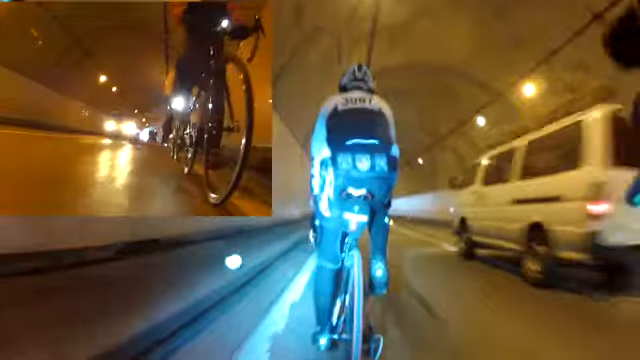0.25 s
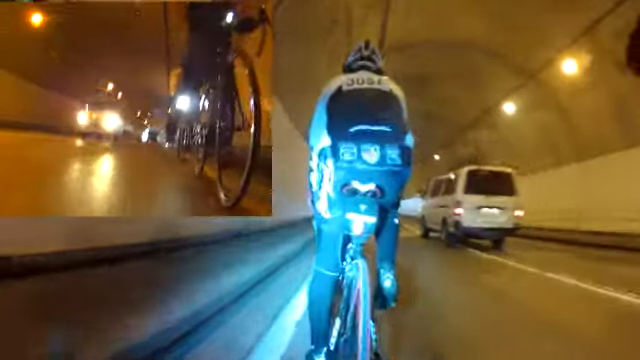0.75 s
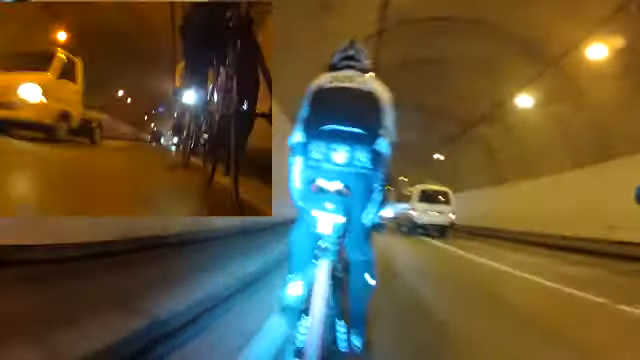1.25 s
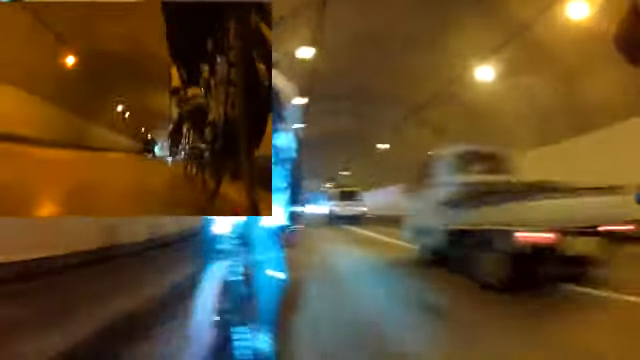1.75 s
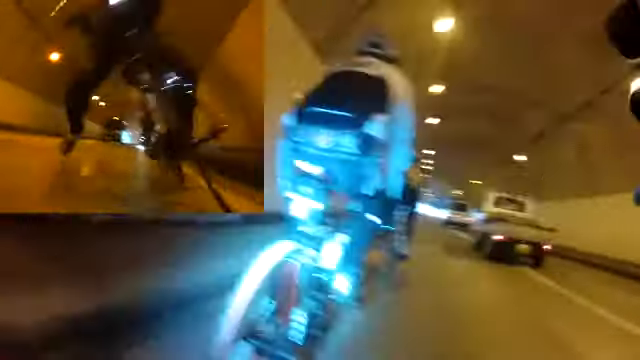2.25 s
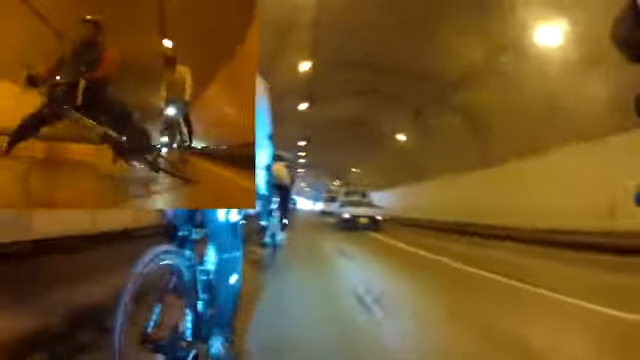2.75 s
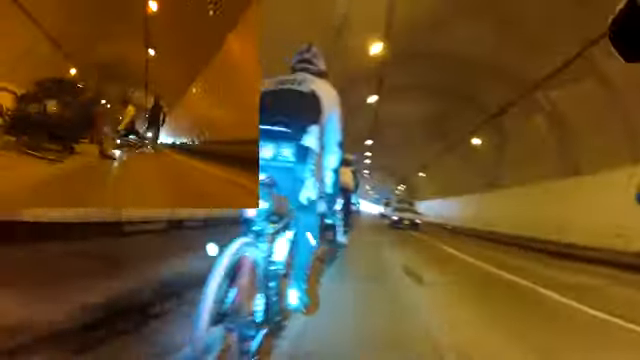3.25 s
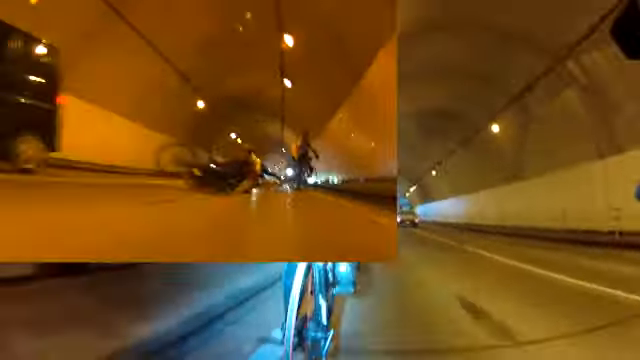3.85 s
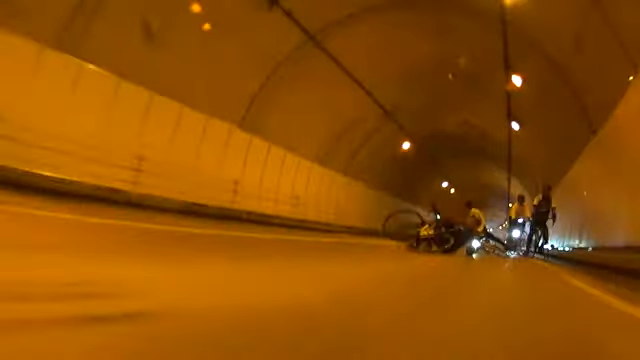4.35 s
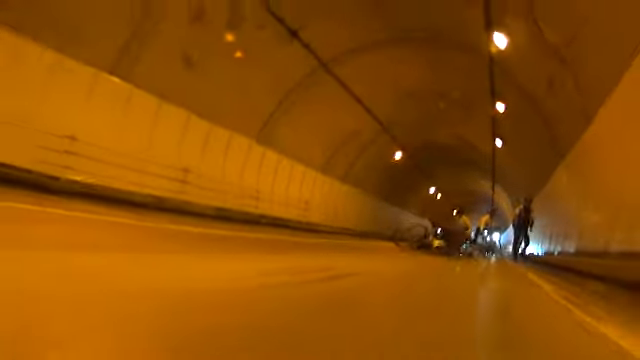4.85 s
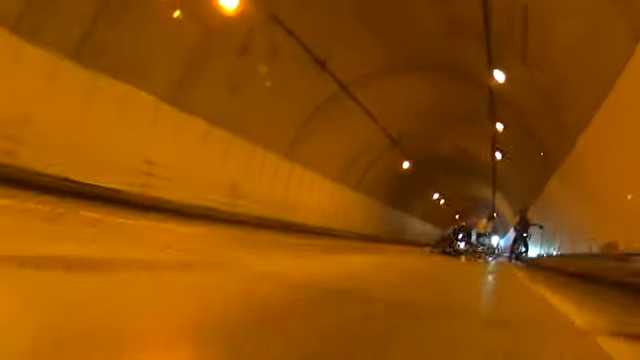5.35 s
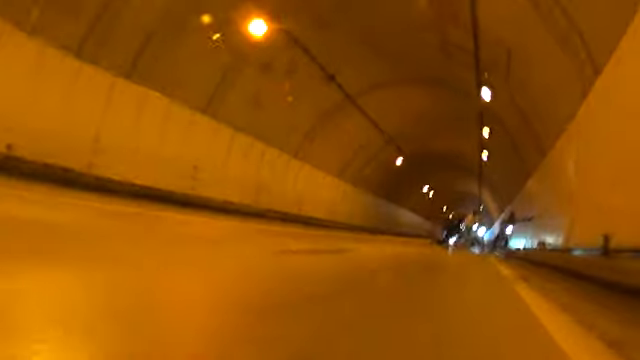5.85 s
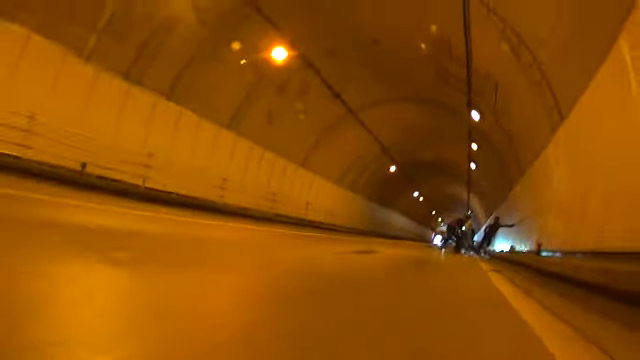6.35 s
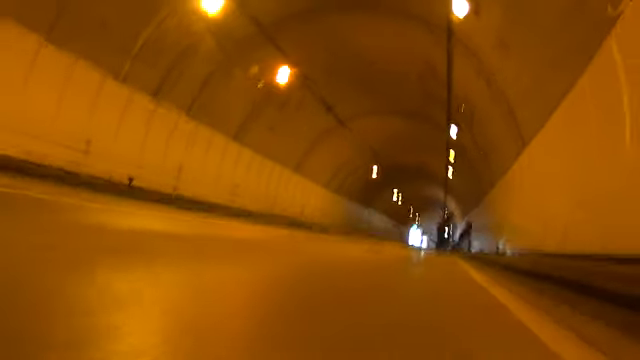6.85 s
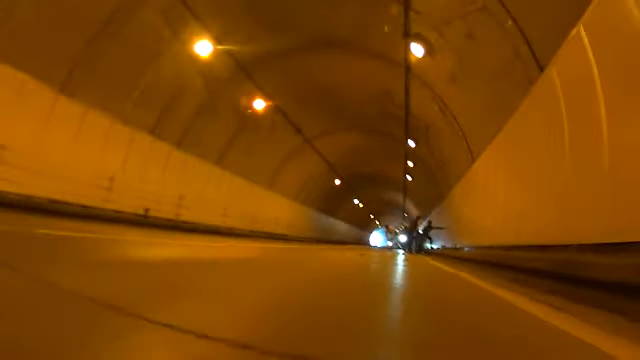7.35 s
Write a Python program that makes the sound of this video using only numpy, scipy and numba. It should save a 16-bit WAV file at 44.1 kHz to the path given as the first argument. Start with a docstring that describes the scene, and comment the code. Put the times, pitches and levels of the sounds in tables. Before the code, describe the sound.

Close onboard bicycle ride in a tunnel: pulsing low rumble, road buzz and traffic-like roar, broken by hard bumps, gritty scrapes and metallic ticks.

```python
"""A bicycle's loose camera mount bounces near 37 Hz as it rides through a road tunnel.
The rear camera (mono, gain control, coarse clock) adds noise-driven road drone and tyre buzz.
The front camera (two ports) hears banded noise: wind and traffic roar off the tunnel walls.
On top: mount rattle from tapped modes, gritty scrapes, bump knocks shared by both cameras,
chain ticks, wavering rubbing squeals and opposite-phase case twists."""
import sys
import numpy as np
from scipy import signal
from scipy.fft import rfft, irfft
from scipy.io import wavfile
from scipy.ndimage import uniform_filter1d
from numba import njit

SR = 44100
rng = np.random.default_rng(int(sys.argv[2]) if len(sys.argv) > 2 else 0)


def to_wav(sig):
    """Store sig (one row per channel, or 1-D mono) as 16-bit WAV at the path in sys.argv[1].

    Samples outside -1..1 are clipped; the rate is SR.
    """
    pcm = np.clip(np.atleast_2d(sig), -1, 1) * 32767
    pcm = np.round(pcm).astype(np.int16)
    wavfile.write(sys.argv[1], SR, pcm.T)  # frames by channels


N = 335598
TIME = np.arange(N) / SR
HZ = np.maximum(np.fft.rfftfreq(N, 1 / SR), 1)


def undb(db):
    """Amplitude factor of a level in dB."""
    return 10 ** (np.asarray(db) / 20)


def unit(x):
    """Scale to an rms of 1."""
    return x / np.sqrt(np.mean(x ** 2))


def walk(rate_hz):
    """Random levels held 1 / rate_hz s and slewed twice; spread near 1."""
    hold = int(SR / rate_hz)
    steps = np.repeat(rng.standard_normal(N // hold + 1), hold)
    return 1.17 * uniform_filter1d(uniform_filter1d(steps, hold), hold)[:N]


def noise():
    """Spectrum of white noise."""
    return rfft(rng.standard_normal(N))


def ring(push, hz, t60_s):
    """One exponentially decaying mode, struck by push."""
    pole = np.exp(2j * np.pi * hz / SR - np.log(1000) / (max(t60_s, 1 / 500) * SR))
    return signal.lfilter([1], [1, -pole], push).imag


def panned(x, pan_db):
    """Left and right, pan_db apart (left minus right)."""
    return x * undb(np.array([[pan_db], [-pan_db]]) / 2)


def bandpass(x, order, low_hz, high_hz):
    """Butterworth band-pass."""
    return signal.sosfilt(signal.butter(order, [low_hz, high_hz], "band", fs=SR, output="sos"), x)


# bounce of the rear camera on its mount, before gain control: (time [s], level [dB])
WOBBLE = [(0, -5), (.11, -7), (0.191, -19), (.27, -3.5), (.36, -9.5), (0.479, -3), (.63, -17), (.71, -9.5),
          (0.759, -24), (.82, -10.5), (.89, -18), (0.959, -5), (1.261, -9), (1.331, -24), (1.46, -17.5),
          (1.55, -4.5), (1.659, -.5), (1.88, -16), (2.0, -27), (2.13, -9.5), (2.23, -24), (2.35, -11.5),
          (2.55, -26.5), (2.74, -8.5), (2.979, -5.5), (3.16, -19), (3.419, -7.5), (3.54, -20.5), (3.74, -9),
          (3.919, -27), (4.029, -8.5), (4.119, -21), (4.2, -7.5), (4.25, -16.5), (4.31, -4), (4.41, -9.5),
          (4.46, -25.5), (4.658, -4), (4.898, -22), (5.211, -4), (5.309, -22), (5.38, -9.5), (5.431, -24.5),
          (5.62, -8), (5.742, -21.5), (5.791, -12.5), (5.93, -16), (5.99, -28.5), (6.049, -12),
          (6.35, -6.5), (6.48, -21), (6.531, -11), (6.83, -14.5), (6.929, -5), (7.24, -9.5), (7.36, -25),
          (7.451, -24.5), (7.61, -5.5)]


def swing_size():
    """Bounce amplitude, linear between table points."""
    s, db = np.transpose(WOBBLE)
    return np.interp(TIME, s, undb(db))


WOBBLE_HZ, SAG_HZ_PER_DB = 36.58, 0.1  # pitch at -10 dB; wide swings are slower
WANDER_HZ, LOOSE = .6, .25  # pitch drift of wide swings; small ones stray further
WANDER = walk(9)  # one drift, shared by wobble and rattle


def swing_phase():
    """Turns of the mount's bounce so far; pitch depends on swing size."""
    size = swing_size()
    sag_hz = SAG_HZ_PER_DB * (20 * np.log10(size) + 10)
    stray_hz = WANDER_HZ * WANDER * (1 + LOOSE / size)
    return np.cumsum(WOBBLE_HZ - sag_hz + stray_hz) / SR


SHAKE_DB = -19.5


def wobble():
    """Phase-jittered sine bounce plus narrow noise near 37 Hz: the road's shaking."""
    swing = np.sin(2 * np.pi * swing_phase() + 0.62 * walk(30))  # jitter in rad
    shake = unit(irfft(noise() / (1 + ((HZ - 37) / 9) ** 4), N))
    return np.sqrt(2) * swing * swing_size() + undb(SHAKE_DB) * shake


def shaken(modes, flicker_db, flicker_rate_hz):
    """Road grain drives each resonance with its own noise; each level flickers alone."""
    out = 0
    for hz, width_hz, db in modes:
        tone = irfft(noise() / (1 + ((HZ - hz) / width_hz * 2) ** 2), N)
        out = out + undb(db + flicker_db * walk(flicker_rate_hz)) * tone
    return unit(out)


# road coarseness under the tyres, for drone and buzz: (time [s], level [dB])
ROAD = [(0, -2), (.45, -1), (.75, -1), (1.1, -0.5), (1.45, -2.5), (1.7, 1), (2.1, -1), (2.5, 3), (3.0, -1),
        (3.2, 0.5), (3.7, 0), (4.15, -0.5), (4.65, 0), (4.91, 3), (4.935, -5), (4.98, 0), (5.25, -2.5),
        (5.9, 1), (6.3, -1), (6.8, 0), (7.0, -0.5), (7.33, 0), (7.41, -3.5), (7.47, -0.5), (7.61, -2)]


def road_coarseness():
    """Road drive amplitude, interpolated in dB."""
    return undb(np.interp(TIME, *np.transpose(ROAD)))


# frame modes: (frequency [Hz], width [Hz], relative spectral peak [dB])
DRONE = [(73.5, 55, -16.5), (123.6, 35.6, 0.5), (150.7, 20.6, -4), (203.2, 49.3, -2), (233.5, 23.5, -6)]
DRONE_DB = -17.5  # where ROAD is 0 dB


def drone(road):
    """Frame resonances driven by the road."""
    return road * undb(DRONE_DB) * shaken(DRONE, 1.0, 13)


# case modes: (frequency [Hz], width [Hz], relative spectral peak [dB])
BUZZ = [(670, 140, -4), (808, 41, 0), (925, 81, 5), (1116, 190, 6), (1323, 440, -1), (1600, 130, -6),
        (1805, 27, -6), (2000, 160, -11.5), (2370, 160, -27)]
BUZZ_DB = -32  # where ROAD is 0 dB
BUZZ_FOLLOWS = 0.88  # dB of buzz per dB of ROAD


def tyre_buzz(road):
    """Case resonances driven by the tyres; follows the road slightly less than the drone."""
    return road ** BUZZ_FOLLOWS * undb(BUZZ_DB) * shaken(BUZZ, 0.71, 8.5)


@njit
def follow(level, up, down):
    """One-pole follower with separate rates for rising and falling level."""
    out, e = np.empty(len(level)), level[0]
    for i in range(len(level)):
        e += (level[i] - e) * (up if level[i] > e else down)
        out[i] = e
    return out


HOLD_DB, RATIO, ATTACK_S, RELEASE_S = -10.5, 3.3, 0.0093, 0.037


def gain_control(x):
    """Pulls the level towards HOLD_DB, so drone and buzz swell when the bounce falls away."""
    power = uniform_filter1d(x ** 2, SR // 37)  # about one bounce
    rms = np.sqrt(np.maximum(power, 0) + 1e-9)
    level = follow(rms, 1 / (ATTACK_S * SR), 1 / (RELEASE_S * SR))
    return x * (undb(HOLD_DB) / level) ** (1 - 1 / RATIO)


REAR_CLOCK_HZ, MIRROR_TOP_HZ = 12000, 12050


def coarse_clock(x):
    """Models a slow sample-and-hold: the slope, modulated at the clock, mirrors the sound below it."""
    slope = np.diff(x, prepend=0) * SR / (np.pi * REAR_CLOCK_HZ)
    slope = signal.sosfilt(signal.butter(1, 160, "high", fs=SR, output="sos"), slope)
    mirror = slope * np.cos(2 * np.pi * REAR_CLOCK_HZ * TIME) * undb(1.84)
    cut = 1 + np.exp(np.clip((HZ - MIRROR_TOP_HZ) / 25, -50, 50))
    return x + irfft(rfft(mirror) / cut, N)


# front roar before flicker: (time [s], wind and traffic roar [dB], treble [dB], hiss [dB])
RIDE = [(0.0, -28.5, -46, -60), (0.36, -33.5, -48, -56.5), (0.78, -30, -48, -58.5), (1.1, -32.5, -47, -57),
        (1.4, -31, -44, -56), (1.42, -27.5, -41, -56), (1.53, -30.5, -40.5, -53), (1.65, -29.5, -41.5, -55),
        (1.95, -31, -44.5, -55), (2.31, -32.5, -47, -57.5), (2.35, -30, -49, -60), (2.41, -32.5, -45, -53),
        (3.07, -35, -47, -55), (3.14, -30, -47.5, -55), (3.33, -37.5, -43, -51.5), (3.43, -29.5, -46, -52),
        (3.62, -33, -47, -56.5), (4.11, -31, -47.5, -55.5), (5.02, -29, -45, -55),
        (5.24, -28.5, -46.5, -57.5), (6.74, -31.5, -45.5, -55.5), (6.929, -28, -47.5, -59),
        (7.21, -32.5, -46, -55), (7.29, -28, -46, -60), (7.57, -31, -47.5, -57.5), (7.61, -31, -48, -59)]
# roar spectrum, relative: (frequency [Hz], sum [dB], difference [dB],
# share of difference tied to sum [0-1], its lead [rad])
ROAR = [(60.7, -45, -77, 0.2, -20), (134, -44, -61, 0.96, 2.5), (216, -50.5, -61.5, 0.14, -2.5),
        (387, -52, -51, 0.84, -2), (448, -59, -56.5, 0.46, -2.5), (599, -56.5, -67, 0.9, 6.5),
        (630, -51, -71, 0, -34), (700, -58.5, -69.5, 0.1, -9), (975, -61.5, -87, 0.2, 7),
        (1294, -68.5, -73, 0.5, 1.5), (1320, -65.5, -99, 0, -28), (1670, -63.5, -114, .1, 2),
        (1843, -68, -90, 0.1, -6), (2060, -75, -81.5, .6, 0.5), (2560, -79.5, -83, .6, 1),
        (3040, -79, -76.5, 0.16, 0.5), (3300, -82.5, -86.5, .2, 3), (4110, -90.5, -86, .1, 0),
        (4910, -85, -105, 0, 8), (6670, -102, -104, 0, 0), (6980, -91.5, -108, 0, 0),
        (7000, -100, -112, 0, 0), (8300, -99, -114, 0, 0), (12200, -104, -120, 0, 0),
        (12200, -125, -135, 0, 0)]
# reference band of each RIDE level column: (low [Hz], high [Hz])
ROAR_BANDS_HZ = [(300, 750), (1800, 4200), (4400, 9200)]
ROAR_SPLIT_HZ, HISS_HZ = 1300, 4400  # bands above follow the treble, then the hiss column


def roar():
    """Wind and traffic off the walls: half-octave noise bands swell together, each flickers alone."""
    s, *columns = np.transpose(RIDE)
    levels_db = [np.interp(TIME, s, c) for c in columns]
    hz, *columns = np.transpose(ROAR)
    sum_db, diff_db, share, lead_rad = (np.interp(np.log(HZ), np.log(hz), c) for c in columns)
    share, common = np.clip(share, 0, 1), noise()
    mid = common * undb(sum_db)
    tied = share * common * np.exp(1j * lead_rad)
    side = (tied + np.sqrt(1 - share ** 2) * noise()) * undb(diff_db)
    rms = [np.sqrt(2 * np.sum(np.abs(mid[(HZ > lo) & (HZ < hi)]) ** 2)) / N
           for lo, hi in ROAR_BANDS_HZ]
    octave = np.log2(HZ / 60)
    swell_db = 1.31 * walk(25) + 0.54 * walk(7)
    out = 0
    for k in range(16):
        part = np.searchsorted([ROAR_SPLIT_HZ, HISS_HZ], 60 * 2 ** (k / 2))
        mask = np.clip(1 - np.abs(2 * octave - k), 0, 1) / rms[part]
        gain = undb(levels_db[part] + 0.41 * walk(22) + swell_db)
        left, right = irfft((mid + side) * mask, N), irfft((mid - side) * mask, N)
        out = out + gain * np.array([left, right])
    return out


# rough road working the loose mount, tap drive: (time [s], thin rattle [dB], hollow rattle [dB])
PATCHES = [(.4, -48, -33), (1.3, -46, -31), (1.55, -43, -28), (1.8, -45, -31), (3.511, -48, -33),
           (5.1, -43, -27), (6.0, -39.5, -31), (6.85, -42, -24), (7.4, -45, -46)]
# thin rattle modes: (frequency [Hz], relative level [dB], t60 [s])
THIN = [(2246, 8, 0.028), (2510, 10, 0.012), (2920, 5.5, 0.015), (4180, -23, 0.0035)]
# hollow rattle modes: (frequency [Hz], relative level [dB], t60 [s])
HOLLOW = [(617, 10.5, 0.032), (910, 11.5, 0.014), (1180, 3.5, 0.018)]
# thin, hollow: lowest tap drive; fall on each side of a patch
CALM_DB, PATCH_DB_PER_S = (-46, -42), (17, 79)
RATTLE_PAN_DB, PORTS_ALIKE = (4.5, .8), (.4, -.2)  # thin, hollow; alike = correlation of the ports
RATTLE_DB = -17.0


def rattle():
    """About once a bounce the loose mount taps its stop with varying force, ringing its modes."""
    s, *columns = np.transpose(PATCHES)
    turns = swing_phase() + .3 + .04 * walk(40)
    taps = np.flatnonzero(np.diff(np.floor(turns)) > 0)
    distance_s = np.abs(taps[:, None] / SR - s)
    out = 0
    for db, fall, calm_db, modes, pan_db, alike in zip(
            columns, PATCH_DB_PER_S, CALM_DB, (THIN, HOLLOW), RATTLE_PAN_DB, PORTS_ALIKE):
        drive_db = np.maximum(calm_db, (db - fall * distance_s).max(axis=1))
        push = np.zeros(N)
        push[taps] = undb(drive_db + 2.2 * rng.standard_normal(len(taps)))
        burst = signal.lfilter([1], [1, -np.exp(-1 / (0.00056 * SR))], push)  # 0.56 ms decay
        push = burst * rng.standard_normal((2, N))
        push[1] = alike * push[0] + np.sqrt(1 - alike ** 2) * push[1]
        rung = sum(undb(g + RATTLE_DB) * ring(push, hz, t60) for hz, g, t60 in modes)
        out = out + panned(rung, pan_db)
    return out


# gritty scrapes: (time [s], length [s], level [dB], grain rate [1/s], lowest [Hz], highest [Hz])
SCRAPES = [(0.705, 0.028, -43, 1500, 1200, 5500), (1.281, 0.042, -44, 1000, 2017, 7530),
           (1.399, 0.14, -40.5, 1700, 1600, 3480), (1.41, 0.4, -53, 890, 4270, 6500),
           (1.5, 0.18, -50.5, 1300, 2700, 3900), (1.5, 0.35, -39.5, 1300, 1580, 2820),
           (1.4, 0.36, -33, 700, 520, 1400), (1.945, 0.03, -44, 980, 1490, 5900),
           (2.335, 0.018, -28, 900, 517, 1900), (2.483, 0.057, -37.5, 1400, 900, 3000),
           (2.491, .06, -48, 1500, 2500, 5500), (3.435, 0.027, -33, 1000, 524, 3300),
           (3.498, 0.064, -33, 470, 483, 1520), (5.053, 0.055, -44, 710, 1190, 6480),
           (6.825, 0.033, -28.5, 950, 644, 1990), (6.828, .03, -45, 900, 2000, 8500),
           (6.858, 0.038, -45, 770, 1500, 5030), (7.369, 0.029, -52, 620, 1495, 4950)]


def scrapes():
    """Uneven grains of grit catch and let go: random noise puffs, band-passed, darker to the top."""
    out = np.zeros((2, N))
    for s, length_s, db, rate, low_hz, high_hz in SCRAPES:
        start, size = int(s * SR), int(length_s * SR)
        chance = rng.random((2, SR // 2))
        grains = (chance[0] < rate / SR) * undb(-2.2 * np.log(chance[1]))
        decay = signal.lfilter([1], [1, -np.exp(-1 / (0.003 * SR))], grains)  # 3 ms
        puffs = decay * rng.standard_normal((2, SR // 2))
        puffs[1] = 0.63 * puffs[0] + 0.5 * puffs[1]
        puffs = bandpass(puffs, 4, low_hz, high_hz)
        puffs = unit(signal.lfilter([1], [1, -.75], puffs))[:, :size]
        out[:, start:start + size] += panned(puffs * np.hanning(size) ** 0.12 * undb(db), 1.5)
    return out


# knocks over bumps: (time [s], peak before sharing [dB], ring [Hz], share in the rear camera [0-1])
KNOCKS = [(.706, -21, 620, .4), (.714, -16, 653, .4), (1.292, -8, 928, .95), (1.296, -21, 1270, .9),
          (1.682, -13.5, 820, 0), (1.688, -17, 660, .1), (1.946, -26, 890, .45), (2.339, -20, 800, .15),
          (2.343, -18, 1090, .2), (2.348, -13, 630, .15), (2.508, -22, 1000, 0.4), (2.522, -18, 1500, .4),
          (3.4375, -17, 850, .2), (3.442, -22, 1400, .2), (3.443, -16, 634, 0.2), (3.451, -18, 800, .2),
          (3.461, -17, 610, .2), (3.471, -23, 1000, .3), (3.511, -20, 644, .3), (3.530, -23, 950, .4),
          (3.543, -20, 1400, .4), (3.549, -19, 950, 0.7), (4.917, -2.5, 214, .9), (5.056, -18, 1230, 0.6),
          (6.369, -16, 632, 0.3), (6.829, -18, 815, 0.25), (6.833, -14, 1170, 0.6), (6.870, -25, 901, .4),
          (7.038, -19, 682, 0.35), (7.378, -2.5, 170, 0.82)]
KNOCK_T60_S = 0.03  # up to 650 Hz; higher rings die sooner


def knocks():
    """A brief noisy blow rings one short case mode; returns the rear and front shares."""
    out, size = np.zeros((2, N + SR)), SR // 5
    t = np.arange(size) / SR
    for s, db, hz, rear in KNOCKS:
        start = int(s * SR)
        push = np.exp(-t / 0.00052) * (np.sin(2 * np.pi * hz * t) + 1.7 * rng.standard_normal(size))
        rung = ring(push, hz, KNOCK_T60_S * np.sqrt(min(650 / hz, 1)))
        rung = rung / np.abs(rung).max() * undb(db)
        out[:, start:start + size] += np.outer([rear, 1 - rear], rung)
    return out[:, :N]


# chain and gear ticks: (time [s], ring peak before pan [dB], edge above 6 kHz re ring [dB],
# boost of modes below 2.5 kHz [dB], boost of modes above 4 kHz [dB])
TICKS = [(0.7243, -21, -19, 1, 3), (1.2914, -19, -18, 0, -2), (1.3056, -24, -17, -3, -1),
         (1.387, -16, -36, -4, 1), (1.5198, -24.5, -20, -8, 2), (1.5394, -33, -17, 0, 0),
         (1.5744, -32, -22, -6, 3), (1.744, -22, -19, 3, 0), (1.7874, -17, -33, -3, -2),
         (1.8358, -26, -32, -4, -2), (1.872, -28, -30, 0, -3), (1.9642, -16.5, -34, 0, -2),
         (2.175, -22, -28, 4, -2), (2.779, -29, -13, 0, 4), (3.389, -21.5, -32, 3, -9),
         (3.424, -29, -30, 3, -6), (3.4385, -22, -30, 6, -4), (3.448, -27, -30, 6, -6),
         (3.4703, -30, -10, 3, 5), (3.4855, -17.5, -29, 1.5, 3), (3.5433, -26, -28, 4, -6),
         (4.868, -26, -39, 0, -8), (5.0575, -15, -22, 0.5, 2), (5.125, -20, -17, 5, 6),
         (5.33, -30, -30, 0, -6), (5.472, -24, -28, 4, -3), (5.838, -22, -26, 0, 4),
         (6.832, -26, -18, 3, 0), (6.8412, -20, -20, 1, 1), (6.849, -36, -8, -6, 4),
         (6.8707, -24, -30, -4, -4), (6.921, -29, -30, 2, -6), (6.977, -28, -28, 2, -3),
         (7.098, -30, -30, 0, -6), (7.152, -15.5, -32, 3, 4), (7.190, -30, -18, -3, 3),
         (7.1994, -13, -28, -1, 1), (7.244, -16, -27, -1.5, -1)]
# chain and case modes: (frequency before detune [Hz], relative level before boosts [dB], t60 [s])
TICK = [(1150, -1, .010), (1680, 7.5, .016), (2220, -1, .010), (2720, 1, .008), (3150, 5, .013),
        (3650, 3.5, .013), (4600, -1, .011), (4950, -2, .011), (5750, -2, .011)]
TICK_DETUNE = .012  # relative scatter: every tick meets the chain at another place
TICK_BODY_DB = 7  # added to all modes below 2.5 kHz
TICK_PAN_DB, TICK_SPREAD_DB = -4, 2.5  # left minus right: mean, scatter


def ticks():
    """A sharp blow with a crackle after it rings chain and case, with a 6-9 kHz edge on top."""
    out, size = np.zeros((2, N + SR)), SR // 20
    fade = np.exp(-np.arange(size) / (.001 * SR))
    for s, db, edge_db, body_db, snap_db in TICKS:
        start = int(s * SR)
        pan_db = TICK_PAN_DB + TICK_SPREAD_DB * rng.standard_normal()
        push = .06 * (rng.standard_normal(size) + rng.standard_normal((2, size))) * fade
        push[:, 0] = 1
        rung = np.zeros((2, size))
        for k, (hz, g, t60) in enumerate(TICK):
            tuned_hz = hz * (1 + TICK_DETUNE * rng.standard_normal())
            if hz < 2500:  # the low body moves both ports alike
                rung += undb(g + TICK_BODY_DB + body_db) * ring(push[0], tuned_hz, t60)
            else:
                rung += (-1) ** k * undb(g + snap_db * (hz > 4000)) * ring(push, tuned_hz, t60)
        edge = bandpass(push[[0, 0]], 2, 6000, 9000)
        edge = edge / np.abs(edge).mean(axis=0)[:SR // 2000].mean()  # mean of the first 0.5 ms
        tick = rung / np.abs(rung).max() + undb(edge_db) * edge
        out[:, start:start + size] += panned(tick * undb(db), pan_db)
    return out[:, :N]


def flutter():
    """Stick and slip breaks a rubbing tone up: its size jumps about."""
    return .9 + .25 * walk(70) + .33 * walk(300)


# rubbing tones: (time [s], length [s], start [Hz], middle [Hz], end [Hz],
# level before flutter [dB], waver [Hz], left minus right [dB])
SQUEALS = [(1.404, 0.04, 630, 640, 650, -25, 15, 0), (1.405, 0.09, 2620, 2650, 2700, -42, 110, 10),
           (1.42, 0.073, 2250, 2100, 2130, -39, 90, -1), (1.43, .05, 3150, 3100, 3050, -44, 110, 8),
           (1.435, .03, 1080, 1030, 980, -30, 49, 3), (1.45, 0.04, 1780, 1800, 1800, -33, 70, 0),
           (1.455, 0.065, 680, 620, 590, -28, 35, -0.5), (1.478, 0.025, 1300, 1280, 1250, -30, 40, 0.5),
           (1.525, .055, 1850, 1820, 1800, -32, 40, 0), (1.515, 0.05, 3750, 3500, 3250, -44, 90, 8),
           (1.565, .03, 3200, 3100, 3050, -43, 60, 10), (1.54, 0.045, 540, 570, 620, -28, 18, -0.5),
           (1.59, .05, 1800, 1840, 1830, -32, 40, 0), (1.645, .04, 1830, 1800, 1800, -34, 45, 0),
           (1.595, 0.035, 590, 640, 690, -27, 20, 0.5), (1.635, .04, 700, 740, 720, -29, 30, 0),
           (1.6, 0.075, 3120, 3060, 2960, -42, 45, 8), (1.69, 0.12, 1810, 1800, 1780, -37, 70, 0),
           (1.728, .02, 2520, 2560, 2600, -40, 40, 8), (1.747, 0.045, 2580, 2650, 2790, -34, 35, 9),
           (1.785, .05, 2790, 2600, 2250, -36, 35, 9), (1.76, 0.063, 640, 630, 620, -31, 30, -1),
           (1.865, 0.03, 2090, 2070, 2000, -36, 30, 10), (2.483, .03, 2350, 2350, 2340, -41, 45, 3),
           (2.475, .085, 8110, 8100, 8110, -57, 13, 0.5)]
SMEARS_AT_HZ = 110  # a tone wavering this far is fully broken up
LAG_RAD_PER_DB = -.17  # right port's lag per dB of pan; negative: the weaker port leads


def squeals():
    """Rubber rubbing on metal sings gliding tones; more waver means a more random amplitude."""
    out, waver, size, grit = np.zeros((2, N)), walk(350), flutter(), walk(250)
    for s, length_s, *hz, db, waver_hz, pan_db in SQUEALS:
        on = np.arange(int(s * SR), int((s + length_s) * SR))
        u = np.linspace(0, 1, len(on), endpoint=False)
        glide_hz = np.polyval(np.polyfit([0, .5, 1], hz, 2), u)
        turn = 2 * np.pi * np.cumsum(glide_hz + waver_hz * waver[on]) / SR
        tone = np.sin([turn, turn - LAG_RAD_PER_DB * pan_db])
        rough = np.clip(waver_hz / SMEARS_AT_HZ, 0, 1)
        stroke = np.sqrt(1 - rough) * size[on] + np.sqrt(rough) * grit[on]
        swell = np.sqrt(2 * np.sin(np.pi * u))
        out[:, on] += panned(tone * swell * undb(db) * stroke, pan_db)
    return out


# taps twisting the front case, one port in, the other out: (time [s], relative push [dB])
TWISTS = [(1.42, -19), (1.539, -16), (1.584, -20), (1.629, -15), (1.68, -17), (1.742, -18)]
# twisting modes: (frequency [Hz], relative level [dB], t60 [s])
TWIST = [(764, 0, .02), (1130, 3, .015), (1400, -3, .012)]
TWIST_DB = -7  # added to every push


def twists():
    """Impulses ring the case briefly, opposite at the two ports."""
    push = np.zeros(N)
    for s, db in TWISTS:
        push[int(s * SR)] = undb(db + TWIST_DB)
    rung = sum(undb(g) * ring(push, hz, t60) for hz, g, t60 in TWIST)
    return np.outer([1, -1], rung)


def scene():
    """Rear camera in mono plus front camera in stereo; knocks bypass the gain control."""
    road = road_coarseness()
    rear_knock, front_knock = knocks()
    held = gain_control(wobble() + drone(road) + tyre_buzz(road))
    rear = coarse_clock(held + rear_knock)
    front = roar() + rattle() + scrapes() + panned(front_knock, .6)
    return rear + front + ticks() + squeals() + twists()


TOP_HZ = 12600


def record(dry):
    """Soft saturation rounds the loudest peaks; an elliptic low-pass cuts the top."""
    rounded = np.tanh(1.047 * dry) / 1.052 * undb(0.43)
    return signal.sosfilt(signal.ellip(10, .2, 80, TOP_HZ, fs=SR, output="sos"), rounded)


dry = scene()
out = record(dry)
to_wav(out)
```